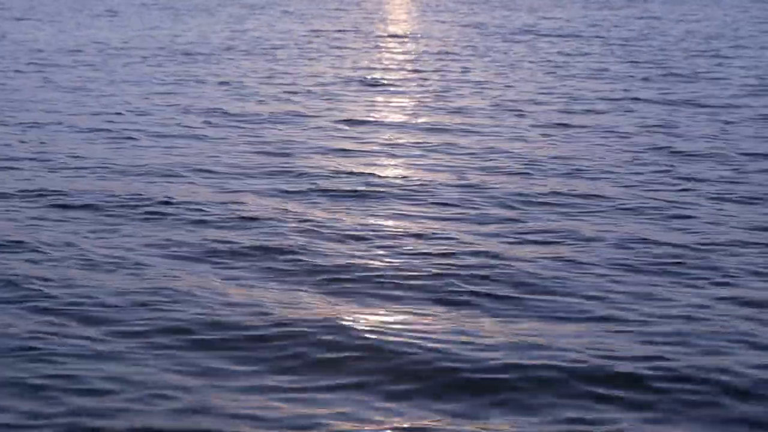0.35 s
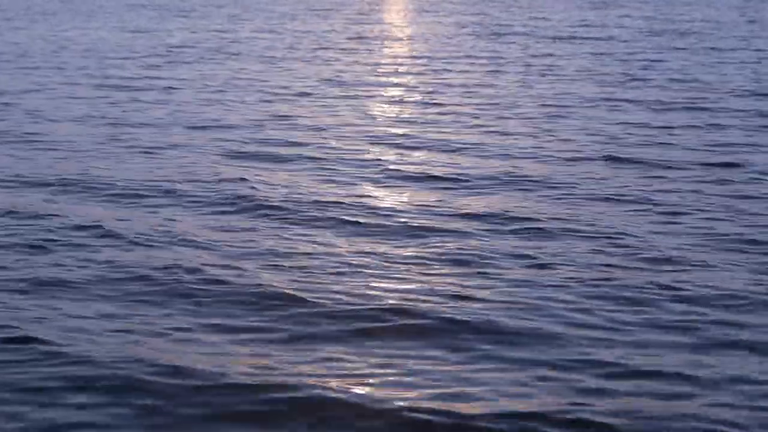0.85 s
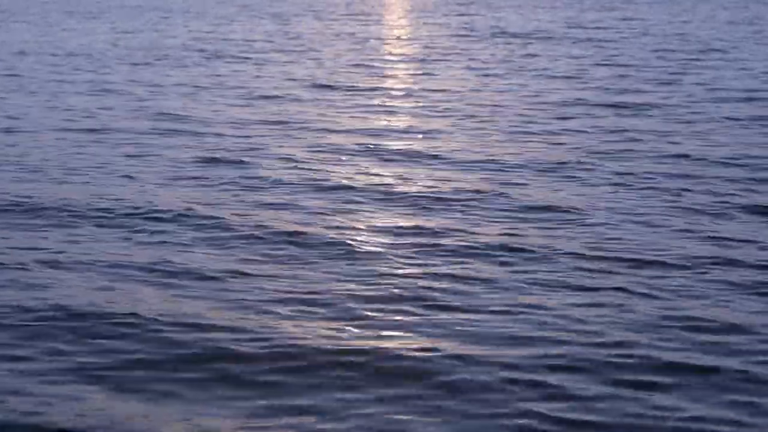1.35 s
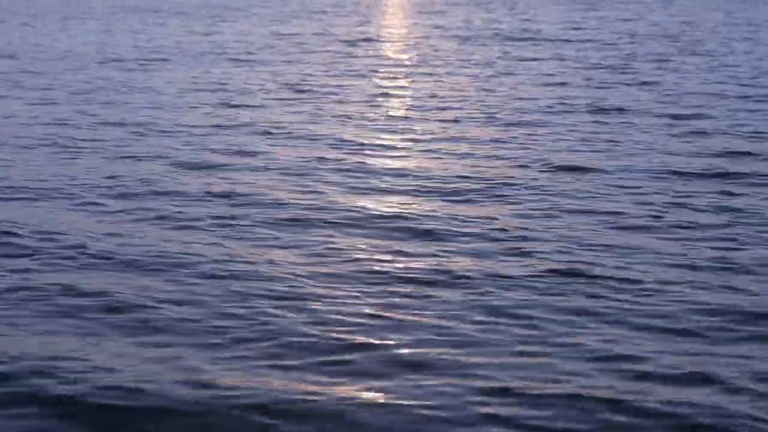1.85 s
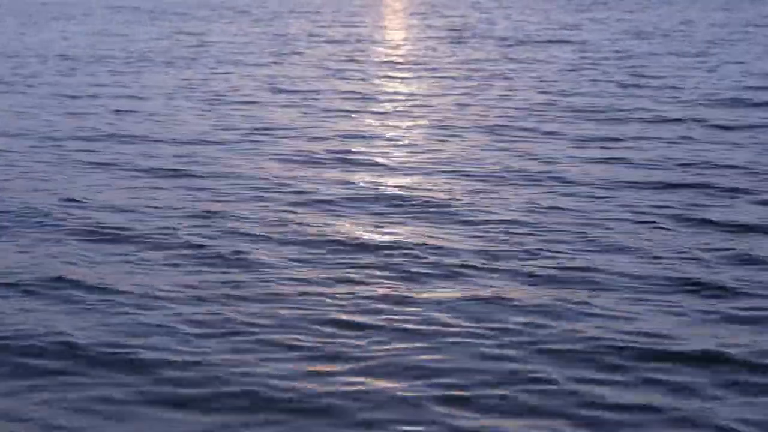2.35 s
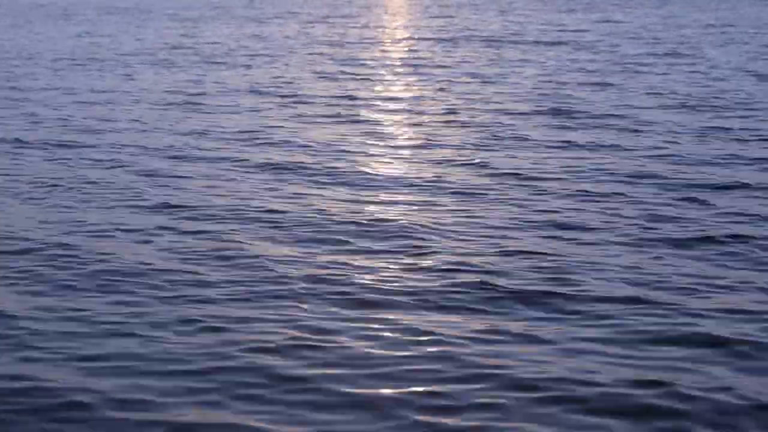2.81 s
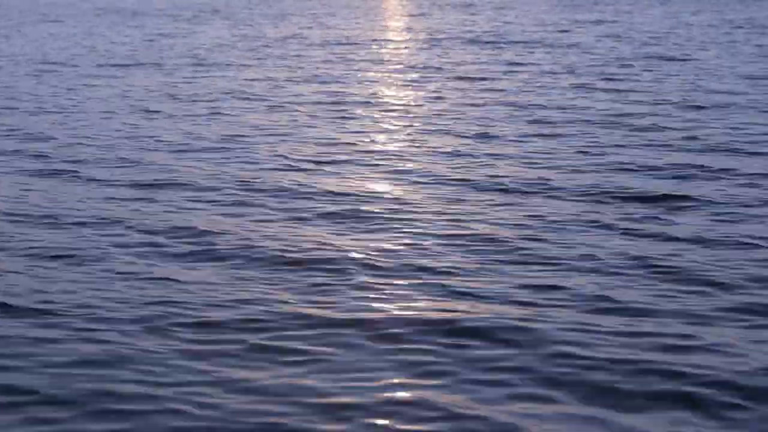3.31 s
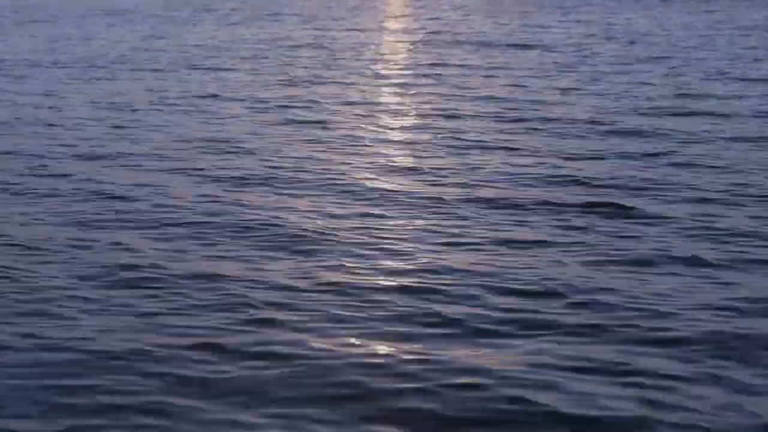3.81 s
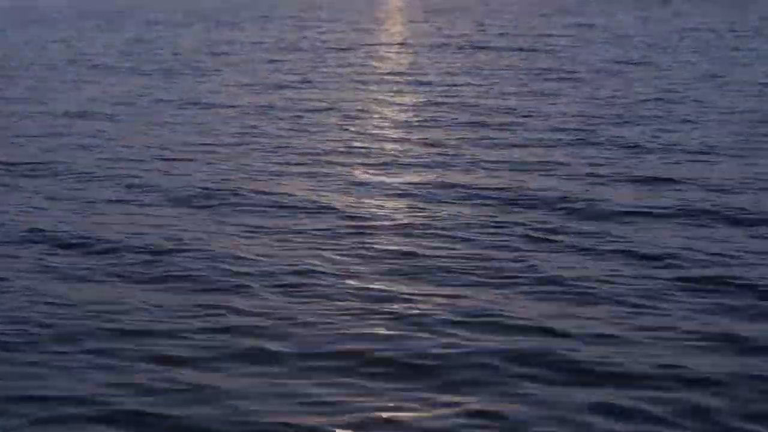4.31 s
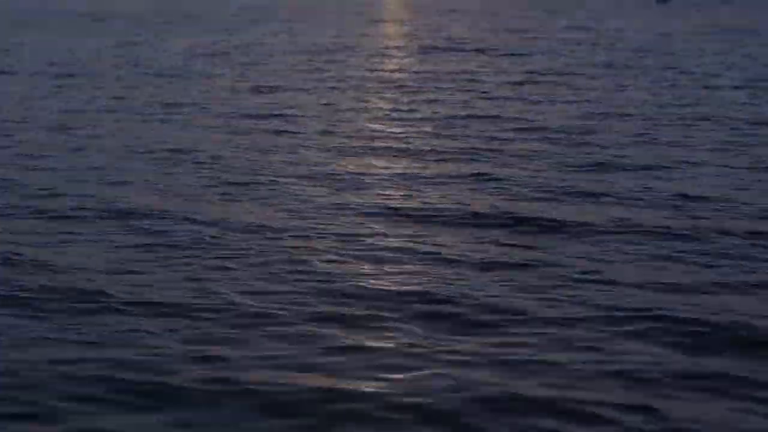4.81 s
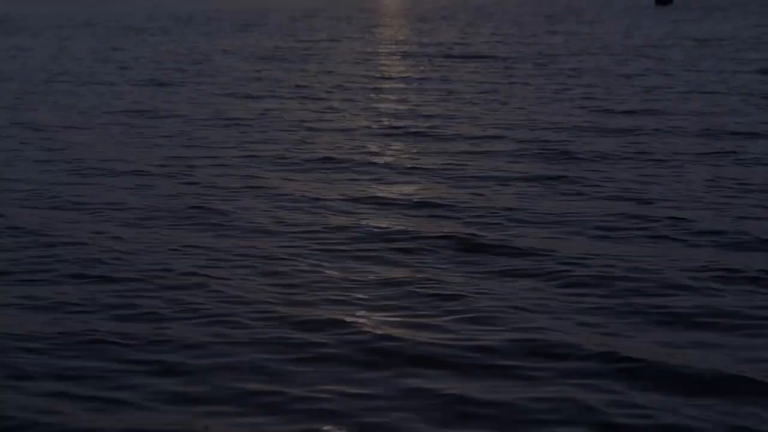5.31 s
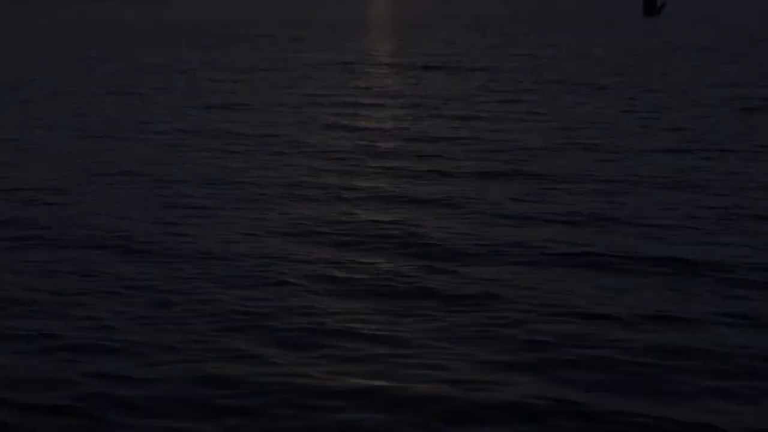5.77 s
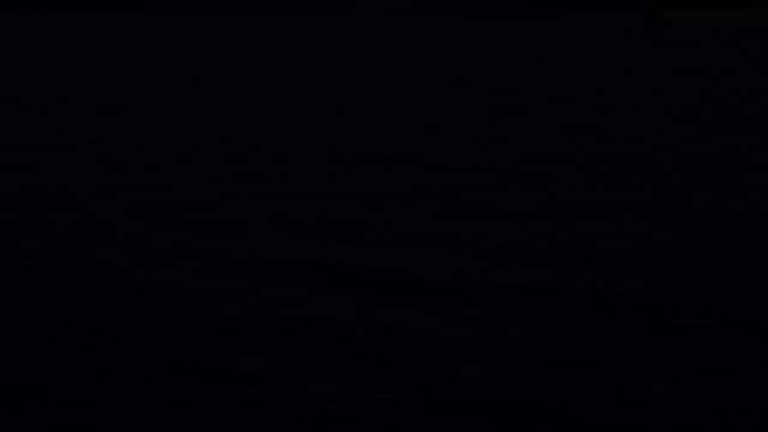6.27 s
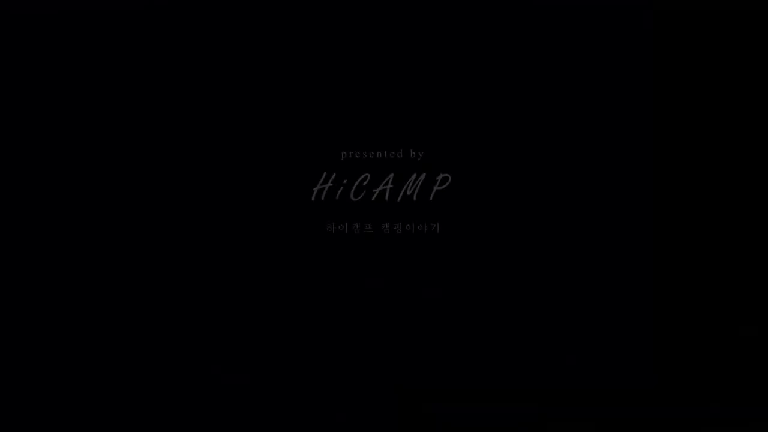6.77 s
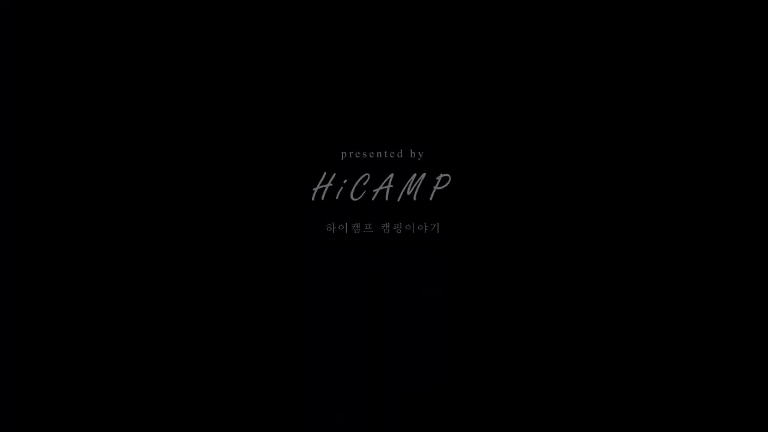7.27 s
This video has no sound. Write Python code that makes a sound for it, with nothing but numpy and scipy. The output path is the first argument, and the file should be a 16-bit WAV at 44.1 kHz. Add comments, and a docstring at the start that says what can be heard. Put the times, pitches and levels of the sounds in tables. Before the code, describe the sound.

Small waves lap irregularly at a shore with bubbly gurgles, crisp plips and droplet ticks, over low wind rumble and faint distant birds.

```python
"""Small waves on a lake shore

Each lap of water sounds as swarms of ringing bubbles, spray, fine mist and a thin wash. Gliding bubbles,
short plips and droplet ticks are decaying sines, set one by one. Behind them a breeze pushes slowly on the
microphone, a low rumble and hiss of open air are shaped noise, and far birds are falling tones."""
import sys
import numpy as np
from scipy import signal
from scipy.fft import rfft, irfft, next_fast_len
from scipy.io import wavfile
from scipy.ndimage import uniform_filter1d, map_coordinates

SR = 44100
rng = np.random.default_rng(int(sys.argv[2]) if len(sys.argv) > 2 else 0)


def log_audio(samples):
    """Write samples as a 16-bit WAV file to the path given in sys.argv[1]."""
    # one column per channel
    frames = np.atleast_2d(samples).T
    # limit to full scale, then quantise
    limited = np.clip(frames, -1, 1)
    pcm = np.round(limited * 32767).astype(np.int16)
    wavfile.write(sys.argv[1], SR, pcm)


def gain_from_db(level_db):
    """Convert decibel levels to linear amplitude factors (20 dB per decade)."""
    decades = np.asarray(level_db, float) / 20
    return 10 ** decades


N = 336569  # samples in the scene

# Pushes of the breeze on the microphone: time_s, rms_db
BREEZE_LEVEL = [(0.0, -46.5), (0.55, -31.5), (1.65, -33), (2.2, -39.5), (2.75, -31.5), (3.85, -32.5),
                (4.4, -29.5), (4.95, -31), (5.5, -25.5), (6.05, -30.5), (6.6, -30), (7.63, -38)]
# Slow swell of the open-air rumble: time_s, rms_db
RUMBLE_LEVEL = [(0, -50), (3.2, -48), (4.4, -47), (7.63, -46.5)]
# Spectra, relative level per Hz: frequency_hz, level_db
PUSH_SPECTRUM = [(1, -4.5), (4, 11), (12, 10.5), (25, -0.5), (45, -15), (90, -75)]
AIR_SPECTRUM = [(20, -12), (40, -7), (60, -7.5), (80, -6.5), (110, -11), (210, -18), (420, -32.5),
                (1600, -38), (5000, -52), (15600, -58)]
GURGLE_SPECTRUM = [(180, -51), (300, -5), (486, -5.5), (1680, -5), (1930, -18.5), (3000, -25), (3900, -29),
                   (6600, -120)]
SPRAY_SPECTRUM = [(1200, 2), (1900, 2.5), (2600, 1.5), (4200, -2.5), (5200, -18), (7000, -32)]
MIST_SPECTRUM = [(3500, -2), (5500, 0), (9000, 1), (12500, -12.5), (15600, -23)]
# Hoarse calls and thin whistles of far birds, relative level: start_s, length_s, start_hz, level_db
HOARSE_CALLS = [(2.63, .15, 5300, -62), (3.04, .17, 5400, -62), (3.46, .2, 5600, -64.5)]
WHISTLE_CALLS = [(6.67, .07, 2800, -65), (7.0, .1, 2900, -60)]
# Laps of water, relative levels: start_s, length_s, gurgle_db, splash_db
LAP_TIMES = [(0.25, 0.34, -47.5, -54), (0.745, 0.3, -49, -57), (1.136, 0.41, -41.5, -52),
             (1.89, 0.46, -43, -49), (2.654, 0.62, -49.5, -55.5), (3.677, 0.35, -44.5, -52.5),
             (4.14, 0.13, -51.5, -55.5), (4.357, 0.13, -46, -50), (4.493, 0.22, -44.5, -54),
             (4.95, 0.26, -51, -57), (5.33, 0.1, -53, -61), (5.59, 0.38, -49.5, -56),
             (6.126, 0.26, -51, -60), (6.494, 0.26, -51.5, -58.5), (7.37, 0.21, -48.5, -55.5)]
# Droplets striking the surface, relative level: start_s, level_db
DROPLETS = [(1.1292, -35), (1.172, -35), (1.34, -41), (3.085, -40), (4.0773, -36.5), (4.439, -35),
            (4.5117, -44), (4.55, -36), (5.015, -40), (5.3541, -37.5)]
# Short bubbles of nearly steady pitch, relative level: start_s, level_db, pitch_hz
SHORT_PLIPS = [(0.686, -36, 3090), (0.711, -35.5, 2180), (1.044, -34.5, 1070), (1.243, -40, 1075),
               (1.244, -35.5, 580), (1.267, -37.5, 910), (1.34, -45, 1340), (1.386, -33, 1740),
               (1.386, -35, 590), (1.471, -32, 860), (1.487, -26, 1600), (1.503, -22, 1700),
               (1.51, -27.5, 1200), (1.515, -21, 2640), (1.516, -35, 3100), (1.533, -22, 1380),
               (1.556, -30, 1465), (2.015, -38.5, 469), (2.055, -32, 1690), (2.128, -37, 1420),
               (2.144, -34, 1570), (2.192, -40.5, 271), (2.232, -35, 1544), (2.257, -40, 2270),
               (2.268, -31, 1280), (2.279, -38, 650), (2.306, -34, 1516), (2.347, -36, 428),
               (2.458, -33, 2560), (2.479, -29.5, 1730), (2.498, -30, 2150), (2.682, -35, 708),
               (3.221, -34.5, 1560), (3.243, -38, 1681), (3.878, -37, 1406), (3.927, -35, 1000),
               (4.186, -36.5, 1710), (4.256, -37, 1690), (4.546, -29, 3120), (4.548, -25, 4040),
               (4.558, -35, 550), (4.65, -30, 1190), (4.69, -36, 995), (4.715, -33, 1984),
               (4.716, -33.5, 2770), (4.736, -35, 2670), (5.062, -40.5, 650), (5.498, -29.5, 1800),
               (5.862, -41.5, 895), (6.259, -38, 4060), (6.612, -42, 4660), (6.746, -36.5, 2430),
               (6.998, -37, 1206)]
# The clearest gliding air pockets, relative level: start_s, level_db, start_hz, end_hz, life_ms
AIR_POCKETS = [(0.377, -45.5, 398, 400, 38), (0.412, -37.5, 497, 665, 11), (0.454, -38, 692, 1010, 38),
               (0.482, -36, 624, 830, 50), (0.606, -33.5, 810, 1070, 36), (1.343, -42.5, 240, 280, 58),
               (1.52, -35, 716, 810, 19), (1.863, -39.5, 770, 763, 28), (2.05, -37, 690, 750, 45),
               (2.359, -35, 553, 780, 24), (3.014, -34, 613, 840, 21), (3.636, -41.5, 412, 455, 83),
               (3.702, -38.5, 616, 1024, 50), (3.761, -36.5, 920, 1175, 27), (3.759, -31.5, 565, 787, 20.5),
               (4.059, -36, 800, 717, 19), (4.079, -28.5, 1330, 1680, 5), (4.133, -35, 950, 1390, 14),
               (4.503, -34.5, 1264, 970, 31), (4.524, -30, 479, 615, 54), (4.531, -27.5, 756, 1020, 16),
               (4.62, -38.5, 480, 510, 39), (4.645, -36, 417, 526, 70), (4.722, -42, 623, 1000, 24),
               (4.745, -37.5, 1060, 1750, 17), (5.066, -40, 937, 1074, 25), (5.24, -36, 1200, 1290, 19.5),
               (5.731, -47.5, 506, 520, 32), (5.815, -43.5, 783, 745, 36), (5.958, -42, 576, 900, 25),
               (6.377, -43.5, 1980, 2300, 13), (6.64, -41.5, 1630, 2050, 11), (6.719, -42, 516, 852, 33)]

SPLASH_REF_DB = -54.5  # splash level about which mist and wash are set
PLIP_CYCLES = 10.6  # life of plips and shed bubbles, in cycles


def unit(x):
    """Normalisation: a signal divided by its root mean square has rms 1."""
    return x / np.sqrt(np.mean(x ** 2) + 1e-20)


def level_curve(rows):
    """Linear interpolation: (time_s, level_db) rows become one gain per sample."""
    time_s, level_db = np.transpose(rows)
    return gain_from_db(np.interp(np.arange(N) / SR, time_s, level_db))


def wobble(rate):
    """Spline interpolation: random knots, rate of them a second, join into a smooth curve."""
    knots = rng.standard_normal(int(N * rate / SR) + 4)
    return map_coordinates(knots, [np.arange(N) * rate / SR])


def gain_at(spectrum, hz):
    """Spectral weighting: the gain of a spectrum is read on a logarithmic frequency axis."""
    frequency_hz, level_db = np.transpose(spectrum)
    return gain_from_db(np.interp(np.log(hz + 0.075), np.log(frequency_hz), level_db))


def hiss(spectrum):
    """Spectral shaping: white noise is weighted in frequency, then scaled to rms 1."""
    size = next_fast_len(N + 8192)
    white = rfft(rng.standard_normal(size))
    shaped = irfft(white * gain_at(spectrum, np.fft.rfftfreq(size, 1 / SR)), size)
    return unit(shaped[:N])


def breeze():
    """Wind pressure: slow pushes on the microphone are very low noise of varying level."""
    return level_curve(BREEZE_LEVEL) * hiss(PUSH_SPECTRUM)


def open_air():
    """Ambient noise: a low rumble with a little hiss swells slowly over the water."""
    return level_curve(RUMBLE_LEVEL) * hiss(AIR_SPECTRUM)


def bird_calls(calls, fall_hz_per_s, waver_hz):
    """Frequency modulation: a falling tone turns hoarse as its random waver (waver_hz rms) widens."""
    out = np.zeros(N)
    for start_s, length_s, start_hz, level_db in calls:
        progress = np.linspace(0, 1, int(length_s * SR))
        waver = unit(uniform_filter1d(rng.standard_normal(len(progress)), size=40))
        pitch_hz = start_hz - fall_hz_per_s * length_s * progress + waver_hz * waver
        tone = np.sin(2 * np.pi * np.cumsum(pitch_hz) / SR)
        envelope = np.sin(np.pi * progress) ** 0.15
        out[round(start_s * SR):][:len(progress)] += gain_from_db(level_db - 0.5) * envelope * tone
    return out


def birds():
    """Superposition: three hoarse calls and two thin whistles are added."""
    hoarse = bird_calls(HOARSE_CALLS, fall_hz_per_s=3800, waver_hz=400)
    return hoarse + bird_calls(WHISTLE_CALLS, fall_hz_per_s=3700, waver_hz=15)


def follow(level_db, attack_s, drift_db, release_db_per_s, calm_db):
    """Energy addition: a layer's gain arrives, swells or sinks, then falls with each lap, over a calm floor."""
    start_s, length_s = np.transpose(LAP_TIMES)[:2, :, None]
    t = np.arange(0, N / SR + .01, .005)
    since = t - start_s
    after = np.maximum(since - length_s, 0)
    arrive = 1 / (1 + np.exp(-np.clip(4 * since / attack_s, -50, 50)))
    drift = drift_db * (np.clip(since / length_s, 0, 1) - 1)  # swells if positive, sinks if negative
    body = gain_from_db(level_db[:, None] + drift) * arrive
    cut = gain_from_db(-release_db_per_s * after)
    trickle = gain_from_db(-19 - 3 * after)  # the water runs back after each lap
    energy = np.sum(body ** 2 * (cut ** 2 + trickle ** 2), axis=0)
    return np.interp(np.arange(N) / SR, t, np.sqrt(energy + gain_from_db(calm_db) ** 2))


def ring(start_s, size, start_hz, end_hz, life_s, attack, flutter_db):
    """Damped resonance: each bubble swells quickly and dies away, under one shared random flutter of level.

    One gliding sine per row; attack is a fraction of the life."""
    width = int(np.max(life_s) * SR * 2) + 2
    t = np.arange(width) / SR
    columns = (start_s, size, start_hz, end_hz, life_s)
    start_s, size, start_hz, end_hz, life_s = (np.asarray(c, float)[:, None] for c in columns)
    where = np.round(start_s * SR).astype(int) + np.arange(width)
    age = t / life_s
    # the pocket shrinks or nears the surface
    pitch_hz = start_hz * (end_hz / start_hz) ** np.minimum(age, 1.2)
    swell = 1 - np.exp(-age / attack)
    decay = np.exp(-1.4 * age ** 0.93) * (1 - np.minimum(age / 2, 1) ** 4)  # silent after two lives
    wave = size * swell * decay * np.sin(2 * np.pi * np.cumsum(pitch_hz, axis=1) / SR)
    total = np.bincount(where.ravel(), wave.ravel(), N + width)[:N]
    return total * gain_from_db(flutter_db * wobble(110))


def swarm(spectrum, churn, low_hz, high_hz, cycles, spread_db, glide, count):
    """Random superposition: long-tailed bubble sizes crowd where the water churns; rms 1."""
    when, pitch, big, long, bend = rng.random((count, 5)).T
    pace = np.cumsum(np.exp(churn))
    start_s = np.interp(when * pace[-1], pace, np.arange(N) / SR)
    hz = low_hz * (high_hz / low_hz) ** pitch
    long_tail = gain_from_db(-spread_db * np.log(1 - big * .985))
    size = gain_at(spectrum, hz) * hz * long_tail
    life_s = cycles * (0.5 + 1.3 * long ** 2) / hz
    end_hz = hz * (1 + glide * (bend - .3))
    return unit(ring(start_s, size, hz, end_hz, life_s, attack=0.029, flutter_db=0.5))


def wash(splash_db):
    """Level expansion: a continuous wash grows 1.84 dB per dB of splash, filling the strong laps."""
    level_db = SPLASH_REF_DB - 5.0 + 1.84 * (splash_db - SPLASH_REF_DB)
    gain = follow(level_db, attack_s=0.5, drift_db=2, release_db_per_s=116, calm_db=-86)
    return gain * hiss(SPRAY_SPECTRUM)


def mist(splash_db, churn):
    """Level compression: the finest bubbles, over hiss, grow only 0.8 dB per dB of splash."""
    level_db = -66.5 + 0.8 * (splash_db - SPLASH_REF_DB)
    fine = gain_from_db(-2.0) * swarm(MIST_SPECTRUM, 1.6 * churn, 4640, 16100, cycles=5.4, spread_db=5.0,
                             glide=0.072, count=4000)
    fine += gain_from_db(-5.5) * hiss(MIST_SPECTRUM)
    return follow(level_db, attack_s=0.44, drift_db=-3.5, release_db_per_s=64, calm_db=-82.5) * fine


def spray(splash_db, churn):
    """Bubble resonance: a dense swarm of small bubbles rings as each lap splashes."""
    small = gain_from_db(0.5) * swarm(SPRAY_SPECTRUM, 0.8 * churn, 1670, 5480, cycles=10.4, spread_db=4,
                             glide=0.19, count=5000)
    return follow(splash_db, attack_s=0.45, drift_db=-0.5, release_db_per_s=75, calm_db=-69.5) * small


def gurgle(gurgle_db, churn):
    """Bubble resonance: slow, mostly rising glugs join quicker mid-sized bubbles over faint noise."""
    water = gain_from_db(-4.5) * swarm(GURGLE_SPECTRUM, .4 * churn, 348.5, 1200.6, cycles=18.6, spread_db=3,
                              glide=0.768, count=600)
    water += gain_from_db(-2.5) * swarm(GURGLE_SPECTRUM, .7 * churn, 601.6, 2390, cycles=11.6, spread_db=2.5,
                               glide=0.357, count=2600)
    water += gain_from_db(-18) * hiss(GURGLE_SPECTRUM)
    return follow(gurgle_db, attack_s=0.3, drift_db=3, release_db_per_s=140, calm_db=-71.5) * water


def laps():
    """Common modulation: one quick churning bunches all the swarms, over the wash."""
    gurgle_db, splash_db = np.transpose(LAP_TIMES)[2:]
    churn = np.tanh(wobble(55))
    return wash(splash_db) + mist(splash_db, churn) + spray(splash_db, churn) + gurgle(gurgle_db, churn)


def ticks():
    """Impact excitation: a droplet hits the surface and three tiny bubbles ring for an instant."""
    start_s, level_db = np.repeat(DROPLETS, 3, axis=0).T
    late, pitch = rng.random((len(start_s), 2)).T
    hz = 5500 * 2.2 ** pitch
    return ring(start_s + 0.0017 * late, gain_from_db(level_db - 2), hz, hz, 4.4 / hz, attack=0.08, flutter_db=-0.5)


def plips():
    """Bubble resonance: short plips ring at a nearly steady pitch, rising 1.5 % in one life."""
    start_s, level_db, hz = np.transpose(SHORT_PLIPS)
    return ring(start_s, gain_from_db(level_db), hz, 1.015 * hz, PLIP_CYCLES / hz, attack=0.032, flutter_db=4.0)


def shed_bubbles():
    """Fragmentation: each gliding pocket sheds three smaller bubbles, softer and up to 1.217 octaves higher."""
    start_s, level_db, start_hz, end_hz, life_ms = np.repeat(AIR_POCKETS, 3, axis=0).T
    late, pitch, soft = rng.random((len(start_s), 3)).T
    glide = end_hz / start_hz
    hz = start_hz * glide ** late * 2 ** (1.217 * pitch)
    size = gain_from_db(level_db - 9.5 * (.5 + soft))
    return ring(start_s + late * life_ms / 1000, size, hz, hz * glide, PLIP_CYCLES / hz,
                attack=0.07, flutter_db=3.0)


def gliding_bubbles():
    """Bubble resonance: large trapped air pockets ring, most of them gliding upward."""
    start_s, level_db, start_hz, end_hz, life_ms = np.transpose(AIR_POCKETS)
    return ring(start_s, gain_from_db(level_db + 2.0), start_hz, end_hz, life_ms / 1000, attack=0.056, flutter_db=3.5)


def scene():
    """Superposition: air, birds and water add at one microphone."""
    surroundings = breeze() + open_air() + birds()
    water = laps() + ticks() + plips() + shed_bubbles() + gliding_bubbles()
    return (surroundings + water)[None]


def top_cut(x):
    """Nothing passes above the cut-off."""
    return signal.sosfilt(signal.butter(12, 15760, fs=SR, output="sos"), x)


def record(dry):
    """Signal chain: the finished one-channel mix passes through the last stage."""
    return top_cut(dry)


dry = scene()
out = record(dry)
log_audio(out)
```